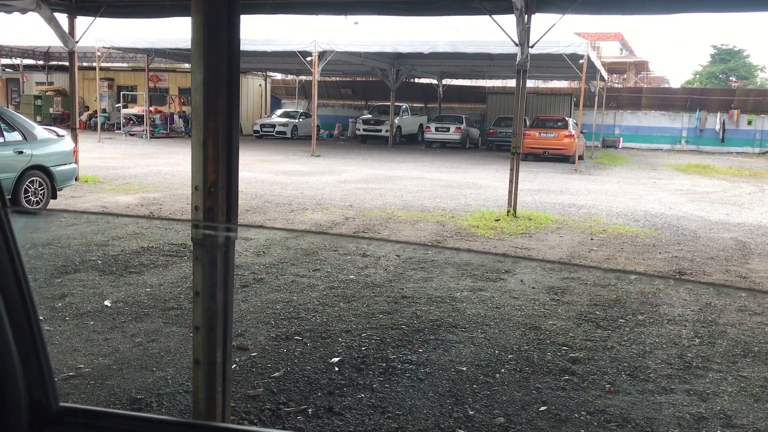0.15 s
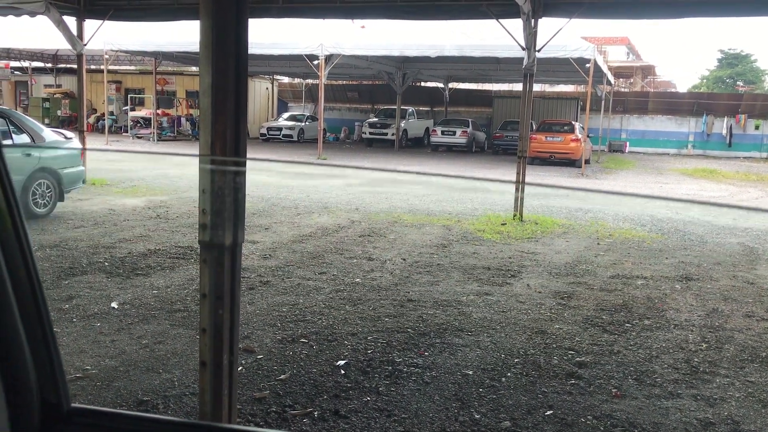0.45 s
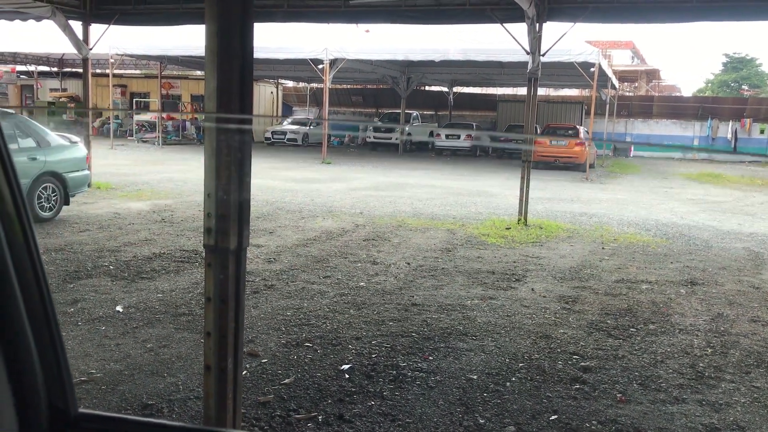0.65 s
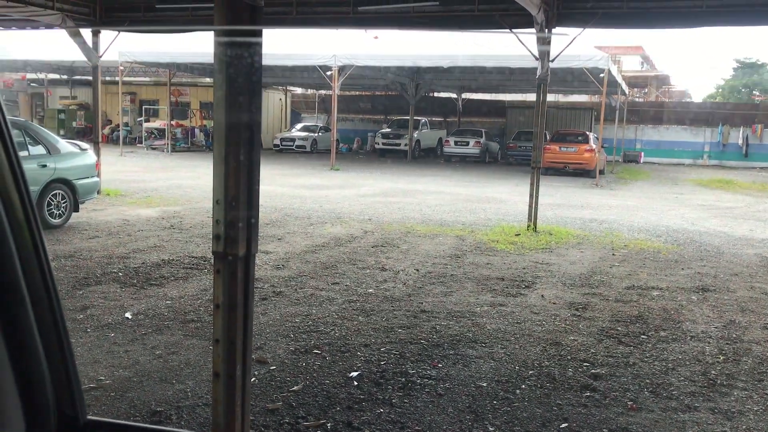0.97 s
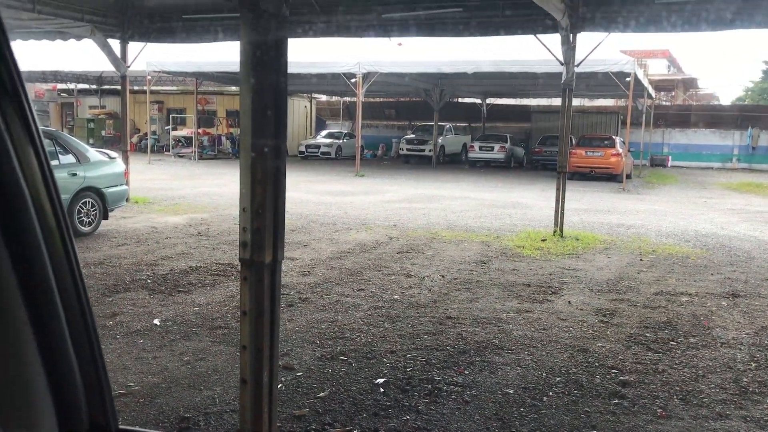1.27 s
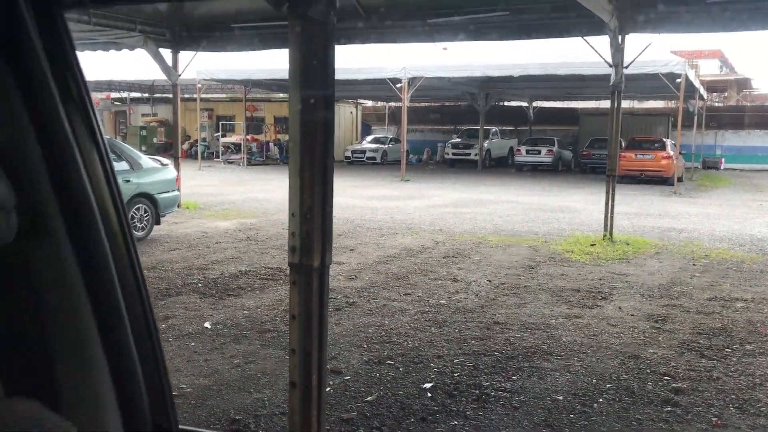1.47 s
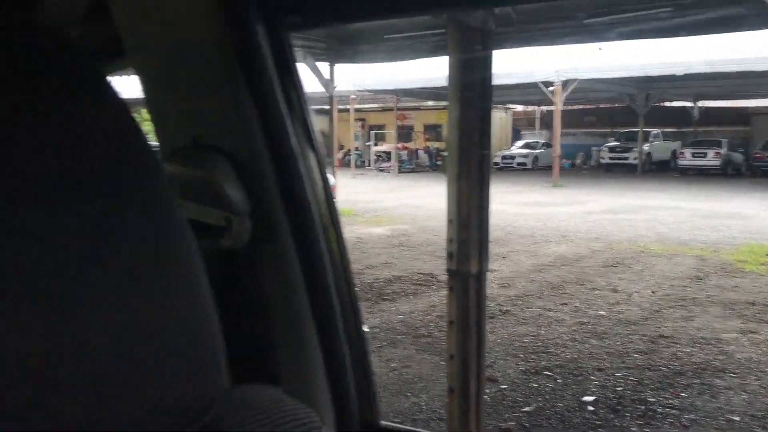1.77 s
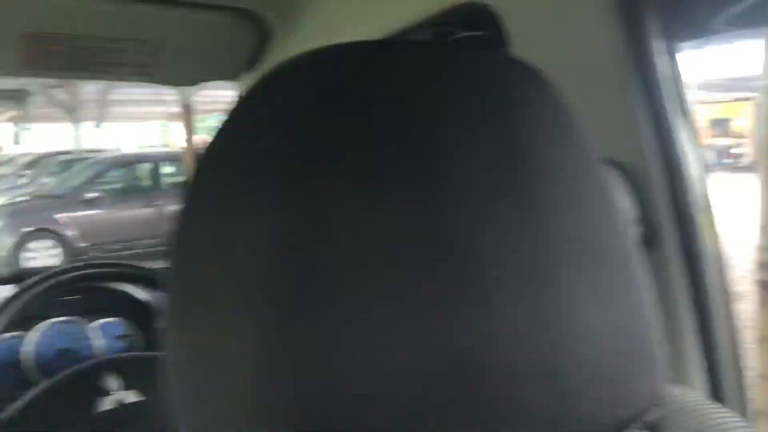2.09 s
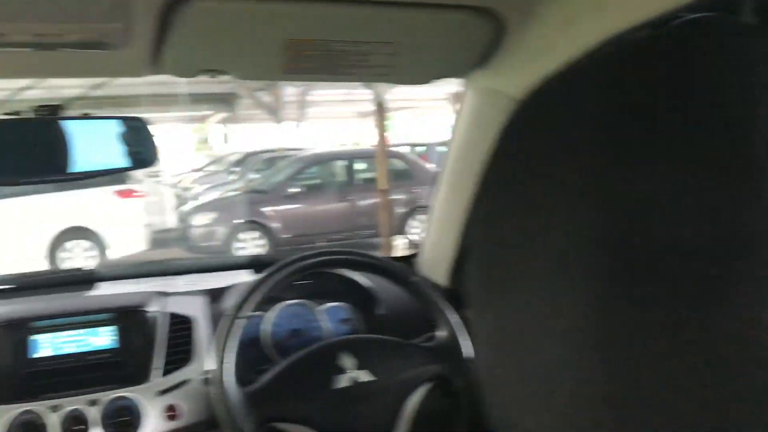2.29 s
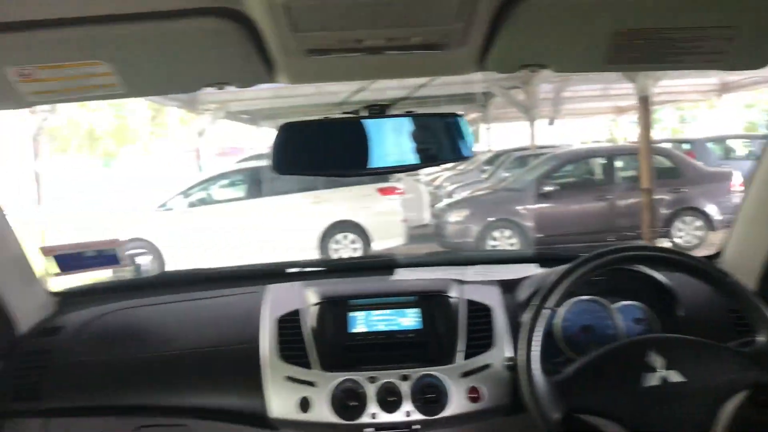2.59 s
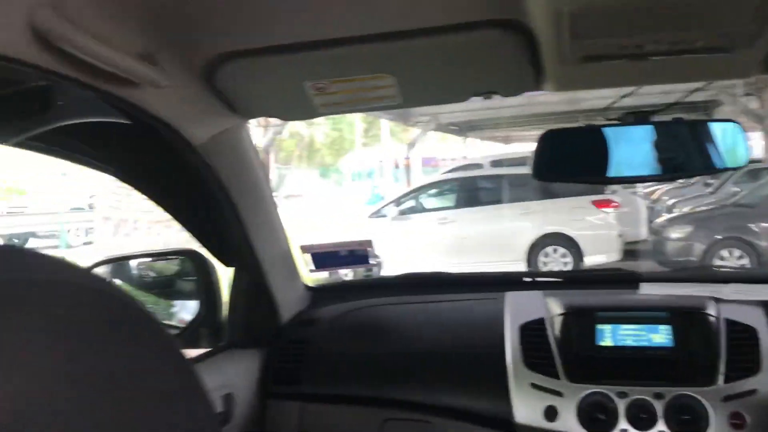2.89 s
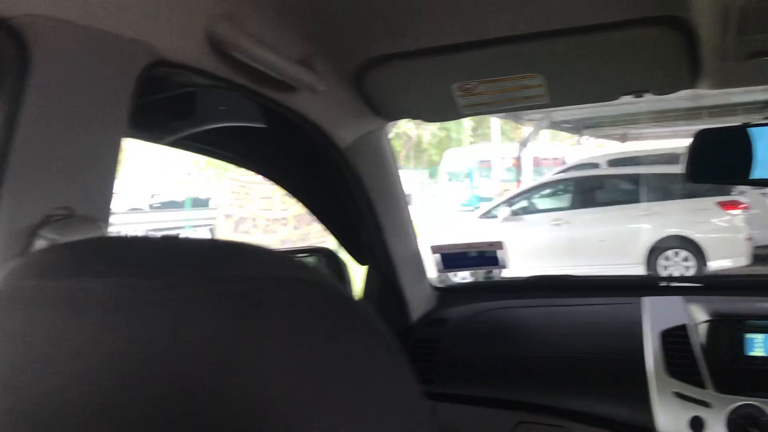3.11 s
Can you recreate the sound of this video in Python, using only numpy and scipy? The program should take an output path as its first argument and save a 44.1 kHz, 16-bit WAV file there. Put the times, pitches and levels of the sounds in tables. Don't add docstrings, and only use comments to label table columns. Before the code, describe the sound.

A car window motor whirs upward in pitch, then the glass thumps shut in an idling car

```python
import sys
import numpy as np
from scipy import signal
from scipy.fft import rfft, irfft, next_fast_len
from scipy.io import wavfile
from scipy.ndimage import uniform_filter1d

SR = 44100
rng = np.random.default_rng(int(sys.argv[2]) if len(sys.argv) > 2 else 0)


def log_audio(samples):
    frames = np.atleast_2d(samples).T
    limited = np.clip(frames, -1, 1)
    pcm = np.round(limited * 32767).astype(np.int16)
    wavfile.write(sys.argv[1], SR, pcm)


def attenuation_scalar(level_db):
    decades = np.asarray(level_db, float) / 20
    return 10 ** decades


N = 143325


def evened(x):
    return x / np.sqrt(np.mean(x ** 2) + 1e-20)


def sine(turns):
    return np.sin(2 * np.pi * turns)


def read(points, hz):
    f, value = np.transpose(points)
    return np.interp(np.log(hz + 1), np.log(f + 1), value)


def curve(table, axis):
    rows = np.array(table)
    return np.interp(np.arange(N) / SR, rows[:, 0], rows[:, axis])


def add(mix, s, sound):
    part = mix[round(s * SR):][:len(sound)]
    part += sound[:len(part)]


def slow(rate_hz):
    t = np.arange(0, N + 64, 64) / SR
    rates = np.geomspace(rate_hz / 10, rate_hz, num=20)
    waver = sum(sine(f * t + rng.random()) / np.sqrt(f) for f in rates)
    return np.repeat(evened(waver), 64)[:N]


def wash(first, second, blend_s, patchy_db, size=1024):
    hop = size // 4
    frames, hz = N // hop + 5, np.fft.rfftfreq(size, 1 / SR)
    a, b, patches = rng.standard_normal((frames, len(hz), 3)).T
    patches = uniform_filter1d(patches, size=12, axis=0)
    patches = evened(uniform_filter1d(patches, size=12, axis=1))
    blend = np.clip(np.arange(frames) * size / 4 / SR / blend_s, 0, 1)
    shape = read(first, hz)[:, None] * (1 - blend) + read(second, hz)[:, None] * blend
    audible = (hz > first[0][0] * 0.6)[:, None]
    z = (a + 1j * b) * attenuation_scalar(shape + patchy_db * patches) * audible
    return signal.istft(z, nperseg=size, noverlap=size * 3 // 4)[1][:N]


def colour(x, points):
    hz = np.fft.fftfreq(2048, 1 / SR)
    log_gain = np.log(attenuation_scalar(read(points, abs(hz))))
    taps = np.fft.ifft(np.exp(np.conj(signal.hilbert(log_gain)))).real[:1024]
    return signal.oaconvolve(x, taps)[:len(x)]


# (time [s], speed [Hz], hum level [dB])
SHAFT = [(0, 101.7, -49), (.1, 98, -57), (.25, 94.8, -55), (.38, 96.8, -58), (.44, 100.5, -52),
         (.5, 98, -55.5), (.62, 98.03, -49.5), (.745, 100.5, -55), (.84, 103.3, -59), (1.04, 111.5, -53),
         (1.1, 113.1, -58.5), (1.3, 118.1, -57.5), (1.5, 121.6, -59), (1.76, 123.3, -62)]
# (multiple of shaft speed, level [dB], extra at full speed [dB])
SHAFT_ORDERS = [(0.987, 4.5, 3), (1.987, -0.5, 3), (3.93, -14.5, 7), (7.02, 1.5, -12), (7.95, 1.5, 0.9),
                (9.15, -0.5, -28), (14.17, -6, 0), (18.08, -4, -12), (18.84, -14, 4.5), (25.2, -11, -3)]
# (frequency [Hz], width [Hz], level [dB])
DOOR_PANEL = [(122, 58, 4), (237.3, 48, 3), (500, 230, -0.5), (757, 58, -0.3), (908, 42, -3),
              (965, 83, 2.5), (1716, 140, -3.5), (2340, 160, 6.5)]


def motor():
    slow_hz, fast_hz = 98, 119
    speed = curve(SHAFT, axis=1) * (1 + 0.005 * slow(29.9))
    turns, out = np.cumsum(speed) / SR, np.zeros(N)
    fast = np.clip((speed - slow_hz) / (fast_hz - slow_hz), 0, 1)
    for k, db, fast_db in SHAFT_ORDERS:
        modes = [attenuation_scalar(d) ** 2 / (1 + (2 * (k * speed - f) / w) ** 2) ** 2 for f, w, d in DOOR_PANEL]
        panel = np.sqrt(sum(modes))
        rough = 1 + 0.32 * slow(24.92)
        blur = 0.065 * (k > 10) * slow(29.4) / 10
        tone = sine(round(k) * (turns + blur) + rng.random())
        out += attenuation_scalar(db + fast_db * fast) * panel * rough * tone
    stall_s = 0.013
    stall = np.clip((FRAME_BLOWS[1][0] + stall_s - np.arange(N) / SR) / stall_s, 0, 1)
    return np.sqrt(2) * attenuation_scalar(curve(SHAFT, axis=2)) * stall * out


# (time [s], hiss level [dB])
SLIDE = [(0.0, -54), (0.036, -54), (1.582, -50), (1.676, -47), (1.788, -48.5), (1.804, -62), (1.83, -57.5),
         (1.878, -85), (1.9, -70)]
# (frequency [Hz], density [dB per Hz])
GAP_WIDE = [(150, -6), (330, -7.5), (600, -17), (1000, -12.5), (2400, -17), (2900, -25.5), (6000, -26),
            (15800, -31.5)]
# (frequency [Hz], density [dB per Hz])
GAP_SHUT = [(150, 3), (260, -35), (340, -16), (2300, -20.5), (4600, -19.5), (6500, -24), (10000, -26),
            (15800, -25)]


def seals():
    hiss = wash(GAP_WIDE, GAP_SHUT, blend_s=1.34, patchy_db=1.1)
    treble = signal.sosfilt(signal.butter(4, 3500, "high", fs=SR, output="sos"), hiss)
    level = np.sqrt(uniform_filter1d(treble ** 2, size=8192) + 1e-20)
    fade = np.clip((1.875 - np.arange(N) / SR) / 0.024, 0, 1)
    return hiss / level * attenuation_scalar(curve(SLIDE, axis=1) + 0.39 * slow(12.62)) * fade


# (multiple of firing rate, level [dB rms], extra with the window open [dB])
FIRING_ORDERS = [(1, -50, 7), (2, -50, 1), (3, -41, -6), (4, -50.5, -6), (5, -55, -22), (6, -56, -15),
                 (8, -66.5, 7.5), (9, -67, -1)]
# (frequency [Hz], density [dB per Hz])
RUMBLE = [(20, -9), (45, 1), (75, 5), (130, -2.5), (200, -6), (330, -14), (420, -31), (700, -45.5)]


def engine():
    firing_hz, waver_db = 23.42, 2.5
    turns = np.cumsum(firing_hz * (1 + 0.003 * slow(3.09))) / SR
    gap = np.clip((1.8 - np.arange(N) / SR) / 0.85, 0, 1)
    hum = np.zeros(N)
    for k, db, open_db in FIRING_ORDERS:
        level = attenuation_scalar(db + open_db * gap + waver_db * slow(4.7))
        hum += level * np.sqrt(2) * sine(round(k) * turns + rng.random())
    rumble = evened(wash(RUMBLE, RUMBLE, 1, patchy_db=1.5, size=2048))
    return hum + attenuation_scalar(-45.5 + 3 * gap) * rumble


# (frequency [Hz], density [dB per Hz])
CABIN_AIR = [(300, -7.5), (600, -2), (1500, -9.5), (2000, -17.5), (4700, -31), (6000, -30), (8000, -25),
             (15800, -41)]


def cabin():
    return attenuation_scalar(-61) * evened(wash(CABIN_AIR, CABIN_AIR, 1, patchy_db=1.5))


# (time [s], blow level [dB], push length [s])
FRAME_BLOWS = [
    (1.733, -17.5, 0.0026),
    (1.7822, -7, 0.0013),
    (1.789, -8.5, 0.0043),
    (1.800, -21.5, 0.0016),
    (1.808, -6.5, 0.0044),
]
# (frequency [Hz], level [dB], t60 [s])
DOOR_BODY = [(99.7, -7, 0.45), (139.6, 3, 0.22), (186, 2.5, 0.21), (226, -0.5, 0.071), (272.1, 2.5, 0.18),
             (351, 5.5, 0.047), (351, -17, 0.47), (425, -5, 0.064), (548, -11.5, .05), (620, -8, 0.095),
             (712, -10.5, 0.11), (1260, -20, .04)]


def thump():
    t, push = np.arange(SR // 2) / SR, np.zeros(N)
    for s, db, length in FRAME_BLOWS:
        shape = np.hanning(round(length * SR) + 2)
        add(push, s, attenuation_scalar(db) * shape / shape.sum())
    ring = np.zeros(len(t))
    for k, (hz, db, t60) in enumerate(DOOR_BODY):
        ring += (-1) ** k * attenuation_scalar(db - 60 * t / t60) * sine(hz * t)
    out = 0.19 * signal.oaconvolve(push, ring)[:N]
    rise_s, sway_t60 = 0.07, 0.73
    sway = attenuation_scalar(-25.5 - 60 * np.maximum(t - rise_s, 0) / sway_t60) * np.minimum(t / rise_s, 1)
    add(out, 1.82, sway * sine(68.06 * t))
    return out


# (time [s], peak level [dB], pitch [Hz], t60 [s], wide snap level [dB])
TICKS = [(1.7371, -39, 990, 0.045, -17), (1.737, -28.5, 2300, 0.045, -10), (1.785, -34, 1260, 0.065, -9),
         (1.8966, -40.5, 1880, 0.052, -15), (1.9098, -33.5, 2130, 0.026, 1),
         (1.9655, -41, 1530, 0.052, -15), (2.0012, -42.5, 1700, 0.046, -23), (2.547, -52, 2900, 0.05, -6),
         (2.737, -45, 600, 0.033, -28), (2.7606, -38.5, 2200, 0.013, -3),
         (2.9713, -32.5, 2770, 0.022, -12.5)]
# (frequency [Hz], density [dB per Hz])
PLASTIC = [(300, -22), (900, 6.5), (2510, 12), (4120, -22), (5940, -20), (15800, -20)]
KNOCK_TIMES = [2.5398, 2.5386, 2.889, 2.942, 2.9745, 3.05, 3.0565, 3.0565]
# (peak level [dB], pitch [Hz], t60 [s])
KNOCKS = [
    (-26, 237, 0.03),
    (-18, 630, 0.0059),
    (-34.5, 365, 0.022),
    (-39, 327, 0.051),
    (-27, 355, 0.026),
    (-50, 85, 0.11),
    (-24, 266, 0.042),
    (-22.5, 480, 0.027),
]


def ticks():
    out, t = np.zeros(N), np.arange(SR // 8) / SR
    noise = rng.standard_normal((len(TICKS), len(t)))
    r = np.exp(-np.pi * 220 / SR)
    crack = colour(1.0 * (t == 0), PLASTIC)
    crack = crack / abs(crack).max()
    for (s, db, hz, t60, snap_db), puff in zip(TICKS, noise):
        snap = attenuation_scalar(snap_db) * evened(colour(puff, PLASTIC))
        poles = [1, -2 * r * np.cos(2 * np.pi * hz / SR), r * r]
        ring = evened(signal.lfilter([1, 0, -1], poles, puff))
        add(out, s + 0.000982, attenuation_scalar(db + snap_db) * 2.06 * crack)
        add(out, s, attenuation_scalar(db - 60 * t / t60) * np.minimum(t / 0.0027, 1) * (snap + 0.51 * ring))
    for s, (db, hz, t60) in zip(KNOCK_TIMES, KNOCKS):
        add(out, s, -attenuation_scalar(db - 60 * t / t60) * sine(hz * t))
    return out


def rub(start, length, db, peak, shade, grains_per_s=15000, spread_db=3.0):
    n = round(length * SR)
    chance, side, size = rng.random((SR // 8, 3))[:n].T
    slips = (chance < grains_per_s / SR) * np.sign(side - 0.5) * attenuation_scalar(-spread_db * np.log(size + 0.011))
    u, peak = np.arange(n) / n, np.clip(peak, 0.05, 0.95)
    stroke = np.minimum(u / peak, (1 - u) / (1 - peak)) ** 0.51
    return start, attenuation_scalar(db) * evened(stroke * evened(colour(slips, shade)))


# (start [s], length [s], level [dB], peak place [0-1])
RUBS = [
    (1.8, 0.061, -48, 0.4),
    (1.892, 0.042, -47.5, 0.6),
    (1.938, 0.074, -54.5, 0.74),
    (2.536, 0.025, -58, 0.3),
    (2.853, 0.048, -50, 0.35),
    (2.878, 0.038, -49, 0.56),
    (2.921, 0.028, -50, 0.6),
    (2.959, 0.017, -51, 0.9),
    (2.981, 0.044, -54.5, 0.7),
]
# (frequency [Hz], density [dB per Hz])
CLOTH = [(300, -2.5), (700, -10), (1700, -21), (2500, -16), (3300, -22.5), (5000, -33), (7500, -36.5),
         (15800, -37)]
# (length [s], level [dB], peak place [0-1])
SCRAPE = (0.039, -34, 0.4)
# (frequency [Hz], density [dB per Hz])
SCRAPE_COLOUR = [(100, -6), (520, -7.5), (868, -24), (2160, -17.5), (4930, -24), (6090, -17), (8000, -28),
                 (15800, -29)]
# (length [s], level [dB], peak place [0-1])
BRUSH = (0.069, -51.5, 0.044)
# (frequency [Hz], density [dB per Hz])
BRUSH_COLOUR = [(500, 1), (2500, 3), (5000, -18), (6100, -11), (8500, -10), (10500, -20), (15800, -16)]


def hands():
    out = np.zeros(N)
    for row in RUBS:
        add(out, *rub(*row, CLOTH))
    add(out, *rub(3.044, *SCRAPE, SCRAPE_COLOUR, grains_per_s=20000))
    add(out, *rub(3.024, *BRUSH, BRUSH_COLOUR))
    return out


# (time [s], peak level [dB], pitch [Hz], t60 [s], bright edge level [dB])
CLICKS = [(1.8962, -45, 6460, 0.0068, -2), (1.9102, -32.5, 2290, .014, -11), (1.9115, -44, 2590, .04, -15),
          (1.9475, -53, 4180, .008, -6), (1.969, -58, 6600, .01, 2), (2.0023, -55, 5030, 0.0066, 6),
          (2.006, -58, 3960, .008, 2), (2.5387, -14.5, 2350, 0.0024, -17),
          (2.5385, -28.5, 6020, 0.0036, -17), (1.8965, -47, 3660, 0.032, -18),
          (1.9475, -38.5, 984, 0.032, -25), (1.9641, -41.5, 1006, 0.047, -22),
          (2.5412, -42, 2500, 0.0074, -14), (2.5592, -45, 8300, .005, -15), (2.7605, -48, 4360, 0.0067, -5),
          (2.8003, -43, 2900, 0.0049, -8), (2.8305, -56, 7500, .006, -8), (2.8585, -49, 2370, 0.023, -18),
          (2.868, -47, 3800, 0.0072, -6), (2.8874, -48, 2700, .015, -18), (2.9395, -45, 2480, 0.027, -18),
          (2.972, -48, 4160, .008, -10), (3.0145, -49, 7000, .006, 2), (3.0253, -44, 6200, .008, -4)]
# (time [s], peak level [dB], pitch [Hz])
SLIPS = [(3.0267, -39, 8140), (3.0303, -42, 6200), (3.0337, -37, 2300), (3.0363, -43, 7500),
         (3.0382, -38, 7000), (3.0414, -31, 7800), (3.0447, -38, 6300), (3.0472, -34, 6500),
         (3.0507, -19.5, 2320), (3.0535, -25, 4240), (3.0552, -14.5, 6100), (3.0556, -22, 8560),
         (3.0608, -23, 5840), (3.0632, -32, 2200), (3.0665, -26, 6000), (3.0738, -30, 14500),
         (3.0787, -41, 4470), (3.0797, -28, 2500)]
# (frequency [Hz], density [dB per Hz])
EDGE = [(500, -5), (2500, -4.5), (6000, -4), (9000, -6.5), (12500, -16), (15800, -16)]


def clicks():
    out, t = np.zeros(N), np.arange(SR // 20) / SR
    slip_t60, slip_edge_db = 0.0047, -6.5
    rows = [*CLICKS, *((*row, slip_t60, slip_edge_db) for row in SLIPS)]
    noise = rng.standard_normal((len(rows), len(t)))
    for (s, db, hz, t60, edge_db), puff in zip(rows, noise):
        edge = attenuation_scalar(edge_db) * evened(colour(puff, EDGE))
        envelope = attenuation_scalar(db - 60 * t / t60) * np.minimum(t / 0.000092, 1)
        add(out, s, envelope * (edge - sine(hz * t)))
    return out


def scene():
    window = motor() + seals() + thump()
    return (window + engine() + cabin() + ticks() + hands() + clicks())[None]


def top_cut(x):
    return signal.sosfilt(signal.butter(12, 16380, fs=SR, output="sos"), x)


def record(dry):
    notch_hz, notch_width_hz, notch_db, edge_hz = 10410, 550, -5.5, 15830
    size = next_fast_len(N + SR // 4)
    hz = np.fft.rfftfreq(size, 1 / SR)
    notch = attenuation_scalar(notch_db * np.exp(-((hz - notch_hz) / notch_width_hz) ** 2))
    port = notch * np.clip((edge_hz - hz) / 100, 0, 1)
    settle = np.minimum(np.arange(N, 0, -1) / 128, 1)
    padded = np.pad(dry * settle, ((0, 0), (0, size - N)))
    mix = irfft(rfft(padded) * port, size)[:, :N]
    return top_cut(mix)


dry = scene()
out = record(dry)
log_audio(out)
```